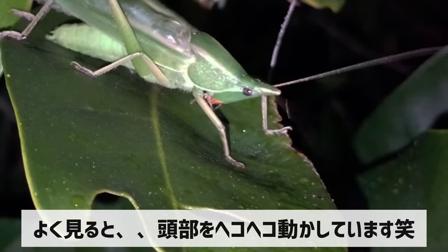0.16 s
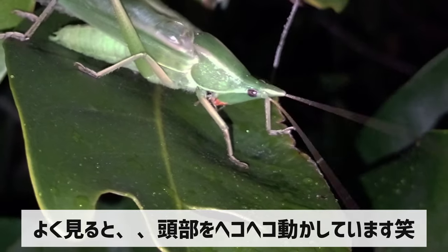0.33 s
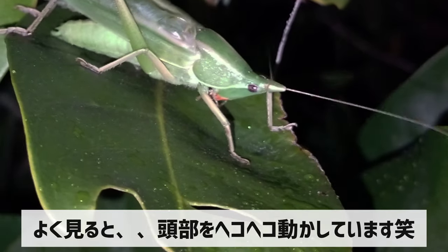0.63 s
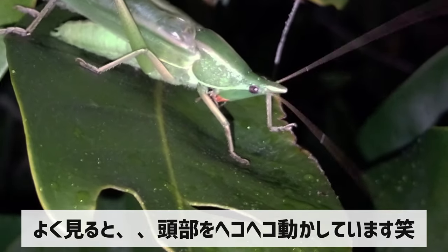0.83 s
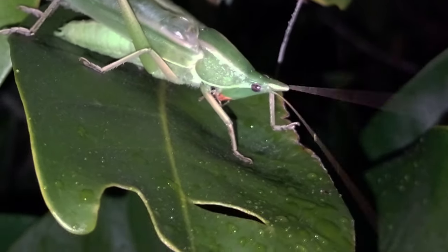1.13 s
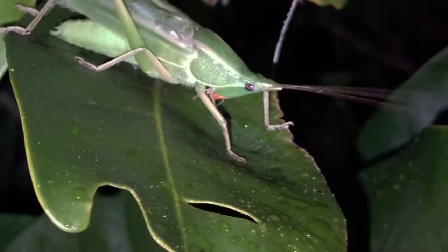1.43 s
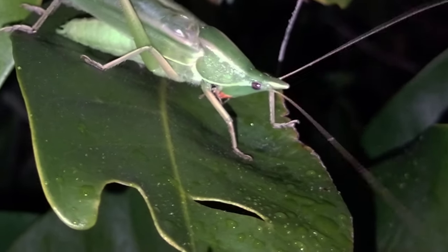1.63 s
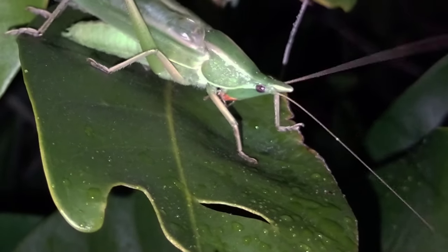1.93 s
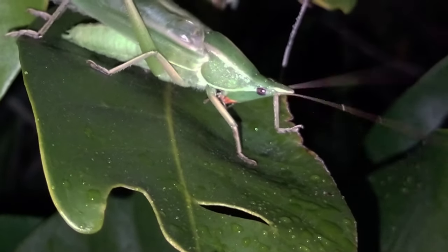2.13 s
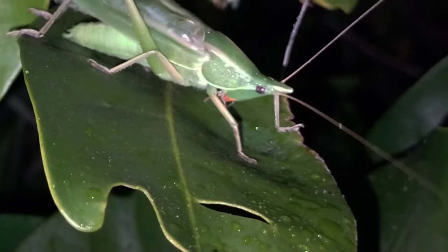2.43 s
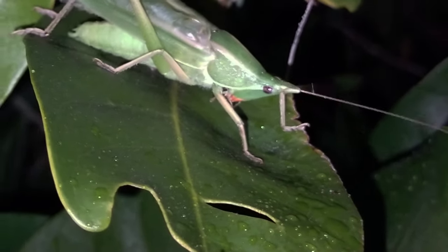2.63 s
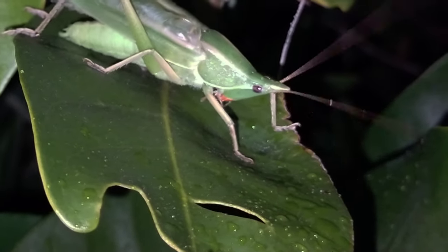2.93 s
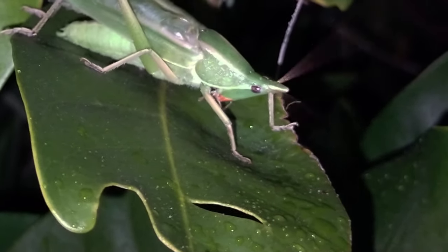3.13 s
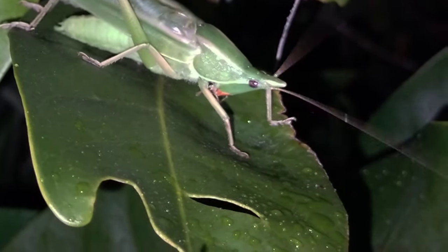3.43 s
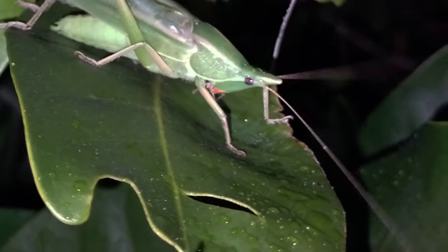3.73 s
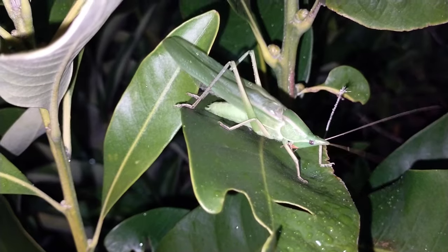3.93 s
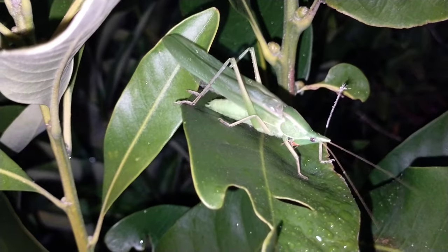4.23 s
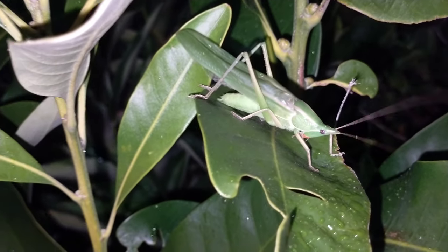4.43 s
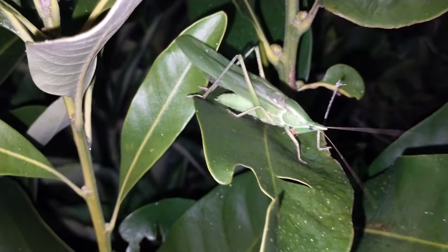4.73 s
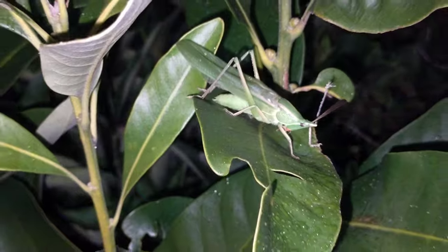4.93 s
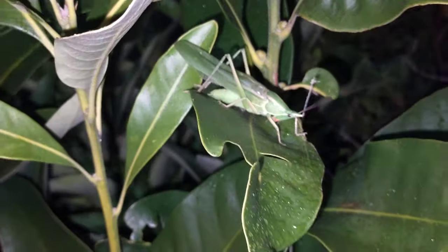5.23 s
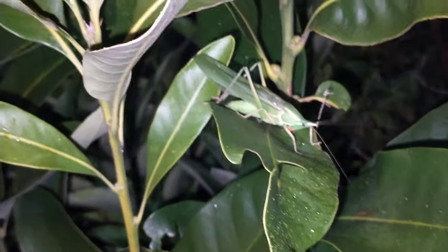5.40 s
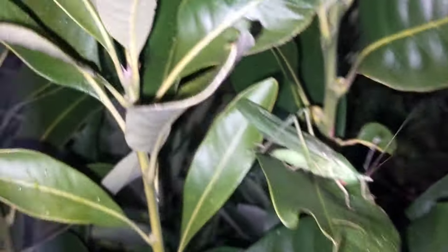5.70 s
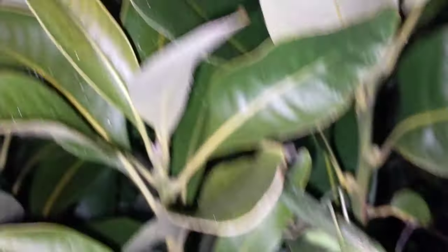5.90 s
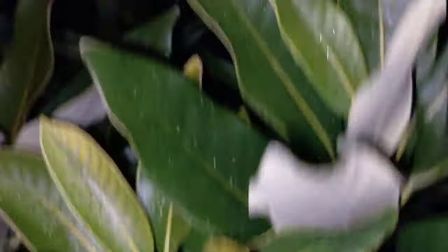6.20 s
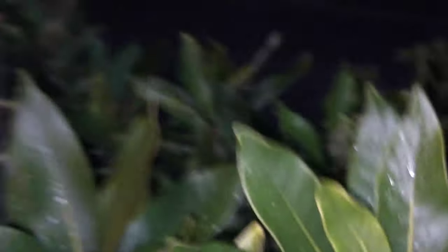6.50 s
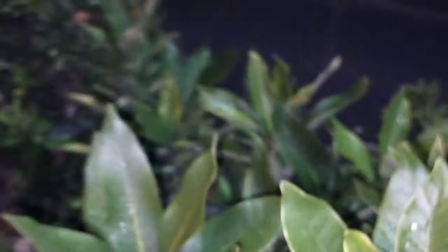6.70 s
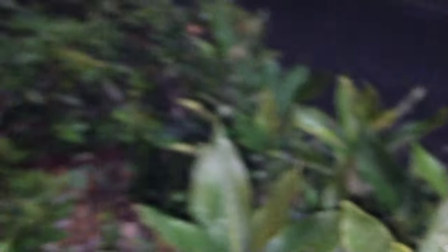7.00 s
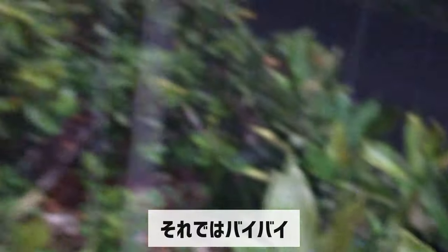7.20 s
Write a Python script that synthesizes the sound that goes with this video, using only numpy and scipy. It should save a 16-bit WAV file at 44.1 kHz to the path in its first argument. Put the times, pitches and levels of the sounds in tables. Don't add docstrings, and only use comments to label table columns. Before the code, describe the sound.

From 0 seconds a katydid close to a handheld stereo microphone buzzes without pause: about 125 quick strokes a second, each a downward-sliding very high tone, roughly 17 to 9 kilohertz, merging into a piercing, grainy sizzle. Nearby leaves give it short echoes and a diffuse shimmer. Beneath are quiet low night air, slightly stronger at first, and a faint hum at the stroke rate. Brief treble flickers and tiny dry ticks appear irregularly. At 3.8 seconds a slight dip and abrupt change of stereo colour mark another position. From 4.5 the buzz drifts and wavers, weakening around 5.4 as a far car passes briefly at 5.5. The hum is stronger from 5.6 to 6.8. From 6.3 the microphone turns away, shifting the buzz's balance and tone. Another longer, soft distant car swell comes around 7.2, the buzz continuing to the end at 7.35.

```python
import sys
import numpy as np
from scipy import signal
from scipy.fft import next_fast_len
from scipy.io import wavfile
from scipy.ndimage import uniform_filter1d

SR = 44100
rng = np.random.default_rng(int(sys.argv[2]) if len(sys.argv) > 2 else 0)


def level_to_linear(level):
    exponent = np.asarray(level, float) / 20
    return 10 ** exponent


def file_out(sig):
    cols = np.atleast_2d(sig).T
    lim = np.clip(cols, -1, 1)
    pcm = np.round(lim * 32767).astype(np.int16)
    wavfile.write(sys.argv[1], SR, pcm)


N = 324135
SECONDS = np.arange(N) / SR
SIDES = np.array([[1], [-1]])
STROKES_PER_S = 124.8
SPLICE_S = 3.805
SECOND_PLACE_ENDS_S = 4.45


def rms_one(x):
    return x / np.sqrt(np.mean(x ** 2) + 1e-20)


def in_time(rows):
    s, *columns = np.transpose(rows)
    return np.array([np.interp(SECONDS, s, c) for c in columns])


def at_hz(points, hz):
    where, value = np.transpose(points)
    return np.interp(np.log(hz), np.log(where), value)


def drift(rate_hz):
    r = np.exp(-2 * np.pi * rate_hz * 40 / SR)
    slow = signal.lfilter([1], [1, -2 * r, r * r], rng.standard_normal(N // 40 + 2002))[2000:]
    return np.interp(np.arange(N) / 40, np.arange(len(slow)), rms_one(slow))


def band(x, low_hz, high_hz, order=2):
    return signal.sosfilt(signal.butter(order, [low_hz, high_hz], "band", fs=SR, output="sos"), x)


def bumps(rows, height):
    return sum(height(level) * np.exp(-((SECONDS - when) / width) ** 2) for when, level, width in rows)


# time in the stroke in ms, tooth rate in Hz.
SLIDE = [(0, 17310), (.7, 15740), (1.6, 15230), (2.5, 14330), (3.1, 13660), (3.6, 12580), (4.3, 11280),
         (5.0, 8950), (5.5, 8650)]
# time in seconds, how far the stroke clock is ahead in strokes.
PACE = [(0, -.161), (.9, .109), (1.5, .35), (2.7, .134), (3.3, .006), (3.8, .18), (3.81, -.05),
        (4.25, -.086), (4.85, -.053), (5.25, .043), (5.45, 0), (5.88, .133), (6.32, .157), (6.87, .055),
        (7.35, -.089)]
ZONES_HZ = [15400, 14300, 13200, 12100, 10400, 9400]


def strokes(late_s, zone_db, chance, own, jitter_ms=.05, uneven_db=1.1, wander_rad=.8):
    ahead = in_time(PACE)[0]
    clock = STROKES_PER_S * (SECONDS - late_s) + ahead + 2.25
    nth = clock.astype(int)
    ms = (clock - nth) * 1000 / STROKES_PER_S + jitter_ms * chance[nth, 0]

    grid = np.linspace(-1, 9, 2001)
    pitch = np.interp(grid, *np.transpose(SLIDE))
    turns = np.interp(ms, grid, np.cumsum(pitch) * (grid[1] - grid[0]) / 1000)
    slowing = uniform_filter1d(-np.gradient(pitch, grid), size=120)
    speed = np.interp(ms, grid, slowing)
    hz = np.interp(ms, grid, pitch)

    top, *_, lowest = zone_db
    knots = [(8400, lowest - 20), *zip(ZONES_HZ[::-1], zone_db[::-1]), (16900, top - 4)]
    where = [knot_hz for knot_hz, _ in knots]
    level_db = 0
    for one, (_, knot_db) in zip(np.eye(len(knots)), knots):
        level_db = level_db + np.interp(hz, where, one) * knot_db

    gate = np.clip(ms / .8, 0, 1) * np.clip((SLIDE[-1][0] - ms) / .3, 0, 1)
    quick = np.sqrt(np.maximum(speed, 0) / 1000)
    height = level_to_linear(level_db + 10.5 + uneven_db * chance[nth, 1]) * quick * gate
    start = wander_rad * np.cumsum(chance[:, 2])[nth]
    apart = own[nth] * np.clip((14900 - hz) / 2000, 0, 1)
    return height * np.sin(2 * np.pi * turns + start + apart)


# time in seconds, nearness in dB, sway 0-1, turn away 0-1.
HAND = [(0, 1.4, 0, 0.15), (3.3, 1.1, 0, 0.07), (4.45, 1.6, 0.16, 0.05), (4.7, 0.1, 0.25, 0.13),
        (5.1, -2, 0.86, 0.14), (5.45, -5.5, 1, 0.08), (5.6, -3, 0.93, 0.18), (5.77, -3, 0.83, 0.29),
        (5.88, 0.5, 0.55, 0.47), (5.99, 0.4, 0.4, 0.26), (6.15, -1.9, 0.81, 0.25), (6.32, -1, 0.4, 0.7),
        (6.45, 1.6, 0.07, 0.49), (6.65, 1.3, 0, 0.7), (6.8, -1, 0.54, 0.75), (6.98, -0.1, 0.35, 0.79),
        (7.15, -3.5, 0.3, 0.91), (7.35, 0.9, 0.12, 0.72)]
FIRST_PLACE = [(-19.5, -23.5, -26.5, -32, -41.5, -40), (0.5, 2, 14.5, 8, 1, 14.5)]
SECOND_PLACE_ADDS = [(0.58, -1.3, 2.9, -0.2, -2.5, -0.48), (-0.84, 1.6, .1, -14, 8, 0.19)]
SWAY_ADDS = [(-.6, 10.6, 0.5, 4.5, 6.4, 12), (3.5, .1, -27.5, -2, 0.61, 0.5)]
TURN_ADDS = [(-4, 3.4, 10, -1.5, -0.7, -3), (-7.5, 3.4, -4, -34, -38.5, -49.5)]


def heard_zones(leaving_s=.2):
    near_db, sway, turn = in_time(HAND)
    second = (SECONDS > SPLICE_S) * np.clip(1 - (SECONDS - SECOND_PLACE_ENDS_S) / leaving_s, 0, 1)
    shares = (1, second, sway, turn)
    tables = (FIRST_PLACE, SECOND_PLACE_ADDS, SWAY_ADDS, TURN_ADDS)
    levels, pans = sum(share * np.array(table)[:, :, None] for share, table in zip(shares, tables))
    return levels + near_db, pans


def echo_ms():
    first, second = np.array([[.972], [.516]]), np.array([[.838], [.842]])
    shrunk = .035 * np.clip(SECONDS - SECOND_PLACE_ENDS_S, 0, 2) ** 3
    return np.where(SECONDS > SPLICE_S, second - shrunk, first)


def cancel(x, dip_hz, width_hz, share):
    wobbling_hz = dip_hz + 90 * drift(9.3)
    turn = np.exp(2j * np.pi * np.cumsum(wobbling_hz) / SR)
    r = np.exp(-2 * np.pi * width_hz / SR)
    near_dip = turn * signal.lfilter([1 - r], [1, -r], x / turn)
    return x - 2 * np.clip(share, 0, 1) * near_dip.real


# time in seconds, phase in radians.
LOW_TURN = [(0, 1.5), (3.8, 1.5), (3.82, -2.6), (4.45, -2.6), (4.7, 0), (7.35, 0)]


def bend_low(x):
    low = signal.sosfiltfilt(signal.butter(8, 11200, fs=SR, output="sos"), x)
    turned = signal.hilbert(low, next_fast_len(N))[:N] * np.exp(1j * in_time(LOW_TURN)[0])
    return x - low + turned.real


def bush(x, scatter_db, t60, stirred_db):
    s = np.arange(5000) / SR
    spray = rng.standard_normal(len(s)) * level_to_linear(-60 * s / t60) * (s > .002)
    wet = signal.fftconvolve(x, spray / np.sqrt(np.sum(spray ** 2)))[:N]
    stirred = (signal.hilbert(wet, next_fast_len(N))[:N] * np.exp(2j * drift(165.0))).real
    deep = band(band(stirred, 8500, 11300)[::-1], 8500, 11300)[::-1]
    return level_to_linear(scatter_db) * wet + level_to_linear(stirred_db) * (stirred + 1.3 * deep)


# time in seconds, left later than right in microseconds.
LEFT_LAG = [(0, 173), (3.8, 166), (3.82, 288), (4.45, 290), (4.65, 282.5), (5.55, 272), (5.7, 243),
            (5.85, 244), (6.0, 236), (6.15, 250), (6.25, 260), (6.3, 254), (6.43, -7), (6.9, -36.5),
            (7.1, -69), (7.35, -50)]
# time in seconds, echo level in dB, cancelled share 0-1,
# cancelled pitch at the left port in Hz, at the right port in Hz.
LEAF = [(0, -5, .6, 12450, 11500), (3.8, -5, .6, 12450, 11500), (3.82, -8, .7, 10900, 11200),
        (4.45, -8, .7, 10950, 11250), (4.6, -8, .4, 11400, 11400), (5.5, -9, .4, 11700, 11800),
        (5.75, -10, .9, 11200, 11600), (5.95, -11, .85, 11300, 11600), (6.1, -11, .3, 11200, 11500),
        (6.3, -15, .4, 11700, 9800), (6.42, -17, .9, 11900, 10100), (6.55, -20, .9, 12300, 11300),
        (6.72, -20, .95, 11900, 12100), (6.9, -20, .8, 11600, 12600), (7.1, -20, .7, 11000, 13800),
        (7.35, -20, .6, 11500, 14800)]
# time in seconds, share 0-1, left pitch in Hz, right in Hz.
STEM = [(0, .6, 13800, 14800), (3.8, .6, 13800, 14800), (3.82, .5, 13800, 14900), (4.6, .5, 13800, 14900),
        (5.45, .5, 13300, 13400), (6.0, .6, 14200, 14700), (6.3, .5, 14900, 15400),
        (6.45, .5, 14500, 14500), (6.8, .5, 14700, 13000), (7.1, .6, 14900, 12600),
        (7.35, .5, 15000, 13000)]


def katydid():
    levels, pans = heard_zones()
    lag_s = in_time(LEFT_LAG)[0] * 1e-6
    thin_db = np.array([[0], [0], [-1.5], [-14], [-9.0], [-9.0]])
    chance = rng.standard_normal((1000, 3))
    echo_db, leaf_share, *leaf_hz = in_time(LEAF)
    stem_share, *stem_hz = in_time(STEM)
    ports = []
    for side, ms, dip_hz, upper_hz in zip((1, -1), echo_ms(), leaf_hz, stem_hz):
        heard = levels + side * (pans - .8) / 2
        own = .55 * rng.standard_normal(1000)
        arrival = side * lag_s / 2
        echo = level_to_linear(echo_db) * strokes(arrival + ms / 1000, heard + thin_db, chance, own)
        near = strokes(arrival, heard, chance, own) + echo
        whole = near + bush(near, scatter_db=-12.0, t60=0.13, stirred_db=-9.0)
        without_leaf = cancel(whole, dip_hz, 450, leaf_share)
        ports.append(cancel(without_leaf, upper_hz, 250, stem_share))
    ports[0] = bend_low(ports[0])
    facing = signal.sosfilt(signal.cheby2(8, 35, 8000, "high", fs=SR, output="sos"), ports)
    away = signal.sosfiltfilt(signal.butter(10, 9500, "high", fs=SR, output="sos"), facing)
    return facing + np.clip(1.2 * in_time(HAND)[2 - 0], 0, 1) * (away - facing)


# time in seconds, rise in dB, width in seconds.
SWELLS = [
    (3.72, 2, 0.11),
    (5.45, 2, 0.3),
    (7.33, 5, 0.37),
]


def air_levels():
    since = np.clip(SECONDS - SPLICE_S, 0, 2.73)
    settling_db = 5.5 * np.exp(-SECONDS / 0.85)
    air_db = -49 + settling_db - 1 * since + bumps(SWELLS, float)
    return air_db, -2 * since


# frequency in Hz, level in dB per Hz.
AIR = [(12, -40), (20, -1.5), (49, 3.5), (96, -2), (120, -2.5), (150, -3), (246, -2.5), (279, -2.5),
       (366, -4), (405, -8), (494, -6.5), (1330, -9), (2500, -12.5), (3800, -19), (5200, -14), (6000, -17),
       (6700, -15.5), (7600, -19), (9880, -3.5), (16700, -120)]
# frequency in Hz, left-right likeness 0-1.
LIKENESS = [(25, .95), (60, .65), (125, .4), (250, .5), (600, .2), (1500, 0), (15000, 0)]


def night_air(patchy_db=1.5):
    air_db, rustle_db = air_levels()
    out = 0
    edges = 20 * 2 ** np.arange(0, 9.1, .25)
    white, together = rng.standard_normal((2, 2, N)), drift(0.18)
    for k, (low, high) in enumerate(zip(edges, edges[1:])):
        mid, side = band(white[k % 2], low, high)
        hz = np.sqrt(low * high)
        alike = np.clip(at_hz(LIKENESS, hz), 0, .95)
        upper_db = rustle_db * (hz > 2700)
        gain = level_to_linear(at_hz(AIR, hz) + upper_db + patchy_db * (0.18 * together + drift(22.7)))
        out = out + gain * (np.sqrt(1 + alike) * mid + np.sqrt(1 - alike) * side * SIDES)
    return level_to_linear(air_db + 3.0 + 2.53 * SIDES) * rms_one(out)


# start in seconds, hum level in dB, sag in dB per second.
AIMS = [
    (0, -24, -0.2),
    (3.799, -30, -1),
    (5.63, -20.5, 4.5),
    (6.85, -33.5, -7),
]


def rectified_hum(dry):
    level_db = np.zeros(N)
    for start, aimed_db, sag in AIMS:
        level_db = np.where(SECONDS >= start, aimed_db - sag * (SECONDS - start), level_db)
    level_db = uniform_filter1d(level_db, size=2500)
    hum = band(dry ** 2, 187, 790, order=1)
    hum = hum + hum.mean(axis=0)
    hum = signal.sosfilt(signal.butter(2, 900, fs=SR, output="sos"), hum)
    return level_to_linear(level_db + 2.4 * drift(1.94) + SIDES) * hum


# frequency in Hz, threshold in dB.
MASK = [(900, -12), (1500, -6.5), (3000, -5.5), (4500, -4), (6500, -3.5), (7100, 0), (8000, -.5),
        (8500, -3), (9200, -6), (11000, -6), (12400, -7), (13000, -30)]


def drop_masked(x, fickle_db=2.0):
    hz, s, cells = signal.stft(x, SR, window="cosine", nperseg=2048)

    def smooth(power, bins, frames):
        return uniform_filter1d(uniform_filter1d(power, size=bins, axis=1), size=frames, axis=2)

    power = np.abs(cells) ** 2 + 1e-20
    around = smooth(power, 64, 20)
    whim = uniform_filter1d(rng.standard_normal(power.shape), size=3, axis=2) * 2
    threshold_db = at_hz(MASK, hz + 1)[:, None] + fickle_db * whim
    kept = smooth(power, 8, 2) > around * level_to_linear(2 * threshold_db)
    folded = np.interp(s, SECONDS, uniform_filter1d(folded_share(), size=700)) > .5
    kept |= folded & (s < 6)
    kept = np.repeat(kept[:, 4::8], 8, axis=1)
    cells[:, :kept.shape[1]] *= kept
    left_over = smooth(np.abs(cells) ** 2 + 1e-20, 64, 20)
    cells *= np.minimum(np.sqrt(around / left_over), 2)
    return signal.istft(cells, SR, window="cosine", nperseg=2048)[1][:, :N]


def sum_and_difference(x):
    return np.array([x[0] + x[1], x[0] - x[1]]) / np.sqrt(2)


# start in seconds, length in ms.
FOLDS = [(.262, 30), (.373, 26), (.565, 20), (.677, 22), (.957, 22), (1.029, 23), (1.236, 47), (1.374, 23),
         (1.749, 23), (1.885, 47), (2.262, 15), (2.768, 47), (2.953, 47), (3.009, 15), (3.073, 18),
         (3.21, 14), (3.305, 30), (3.418, 46), (3.49, 22), (3.537, 22), (3.652, 29), (3.835, 39),
         (4.044, 23), (4.108, 27), (4.164, 23), (4.236, 16), (4.484, 16), (4.765, 23), (5.564, 16),
         (6.29, 149)]
FLICKS = [.354, 1.332, 2.363, 2.597, 2.744, 3.25, 3.689, 4.708, 5.187, 5.733, 5.936, 6.799, 7.286]


def folded_share(ramp_ms=2, lead_ms=1, flick_ms=9):
    ms, share = SECONDS * 1000, np.zeros(N)
    for s, length in FOLDS + [(s, flick_ms) for s in FLICKS]:
        inside_ms = np.minimum(ms - s * 1000 + lead_ms, s * 1000 + length - ms)
        share = np.maximum(share, .95 * np.clip(inside_ms / ramp_ms + .6, 0, 1))
    return share


def fold_treble(x, above_hz=13500, smear_db=-14):
    treble = signal.sosfiltfilt(signal.butter(10, above_hz, "high", fs=SR, output="sos"), x)
    shared = treble[0] + 0.7 * treble[1] + level_to_linear(smear_db) * np.roll(treble[0], 60)

    def running_power(v):
        return uniform_filter1d(v ** 2, size=1400) + 1e-12

    shared = shared * np.sqrt(running_power(treble) / running_power(shared)) * level_to_linear(0.1)
    share = folded_share()
    return x - treble + np.sqrt(1 - share ** 2) * treble + share * shared


# time in seconds, peak in dB, left minus right in dB.
TICKS = [(.2977, -37.5, -15), (3.488, -41, 28), (5.7164, -47.5, -26), (5.85, -44.5, -16),
         (6.975, -45.5, -23), (7.206, -42.5, 0), (7.224, -45, 8), (1.04, -41.5, 25), (1.3908, -36, 12),
         (2.774, -31.5, -9), (2.863, -44, 32), (3.2066, -38, -11), (3.2243, -37.5, 19), (3.4533, -41, 38),
         (4.2393, -47.5, -33), (4.4897, -35.5, -23), (4.7655, -46.5, -24), (5.164, -39.5, 18.5),
         (5.628, -47.5, 23.5), (5.938, -42, 6), (6.0531, -40, -11), (6.094, -44, -15), (6.135, -39, 14),
         (6.159, -43, -12), (6.248, -42, -11), (6.6598, -50, -15), (6.6598, -48, -16), (6.692, -47, -28),
         (6.788, -42, 5.5)]


def ticks():
    out = np.zeros((2, N + 400))
    for s, peak_db, pan_db in TICKS:
        size = level_to_linear(peak_db + 18.0 + pan_db / 2 * SIDES[:, 0])
        at = round(s * SR) + 30
        out[:, at] += size
        out[:, at + round(SR / STROKES_PER_S)] -= size * level_to_linear(-11.5)
    return band(out[:, :N] + 1e-18, 5550, 22000)


# time in seconds, level in dB, width in seconds.
CARS = [
    (5.479, -51, 0.093),
    (7.22, -52, 0.48),
]


def far_car():
    return bumps(CARS, level_to_linear) * rms_one(band(rng.standard_normal((2, N)), 730, 1130))


def scene():
    join = 1 - .6 * np.exp(-((SECONDS - SPLICE_S) / .006) ** 2)
    return (katydid() + night_air() + ticks() + far_car()) * join


def low_pass(x):
    return signal.sosfilt(signal.butter(12, 16810, fs=SR, output="sos"), x)


def record(dry):
    x = drop_masked(fold_treble(dry + rectified_hum(dry)))
    x = sum_and_difference(drop_masked(sum_and_difference(x)))
    x = signal.sosfiltfilt(signal.ellip(10, .1, 50, 15800, fs=SR, output="sos"), x)
    return low_pass(x)


dry = scene()
out = record(dry)
file_out(out)
```